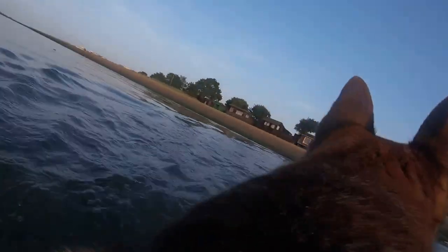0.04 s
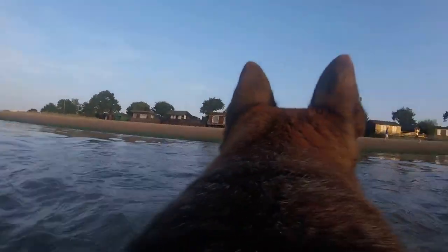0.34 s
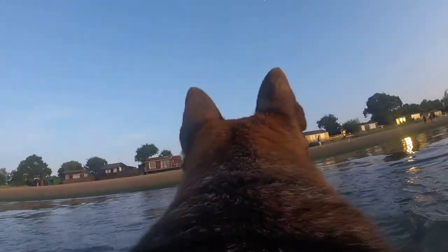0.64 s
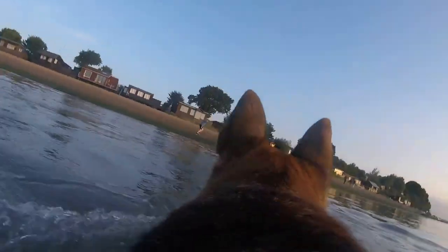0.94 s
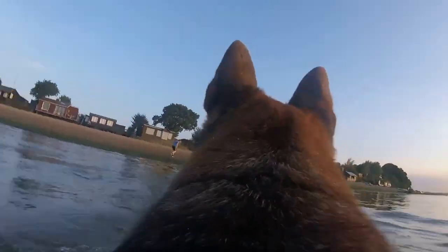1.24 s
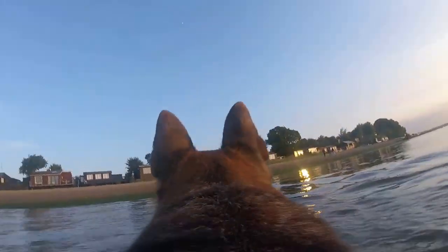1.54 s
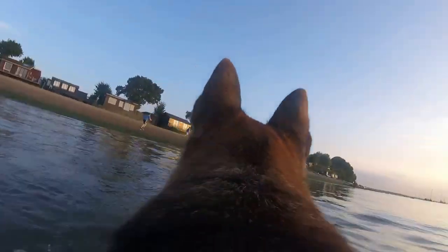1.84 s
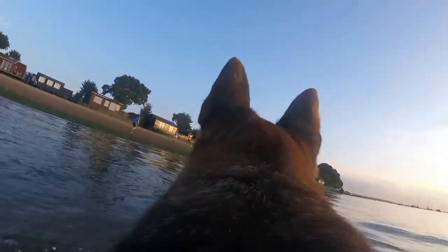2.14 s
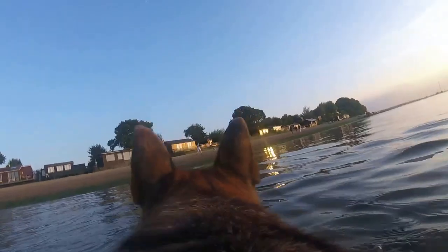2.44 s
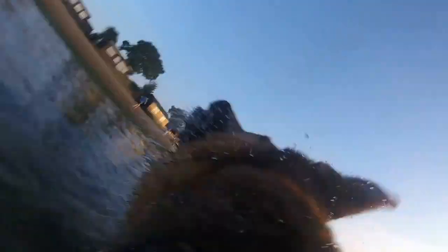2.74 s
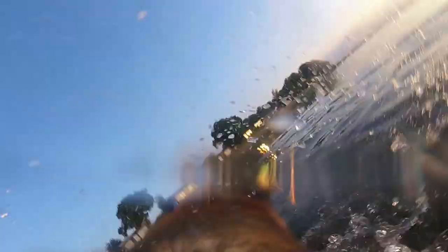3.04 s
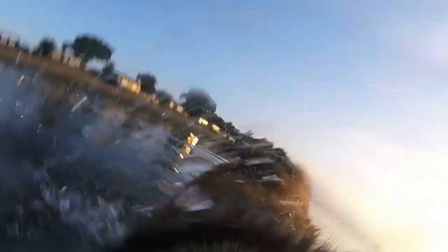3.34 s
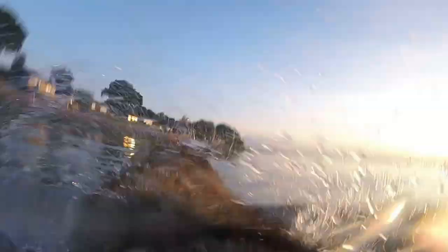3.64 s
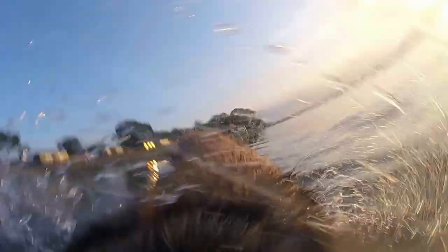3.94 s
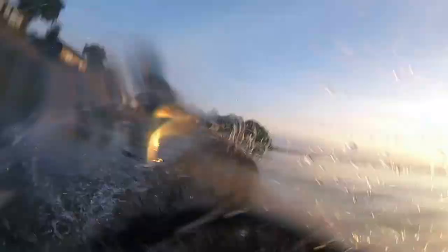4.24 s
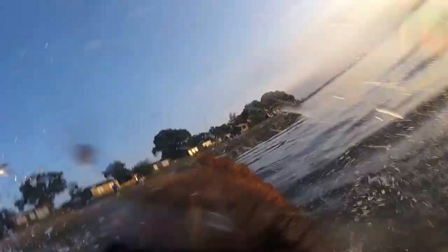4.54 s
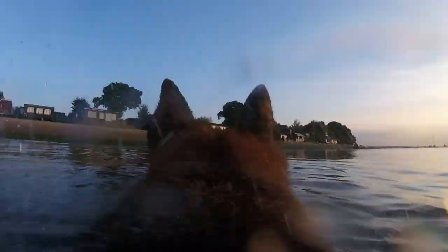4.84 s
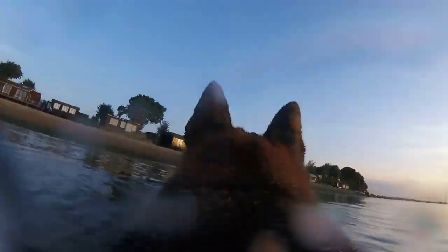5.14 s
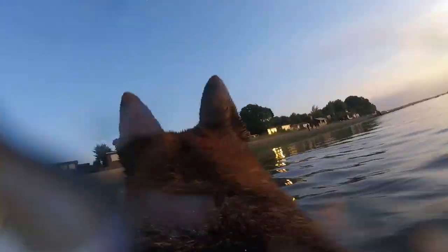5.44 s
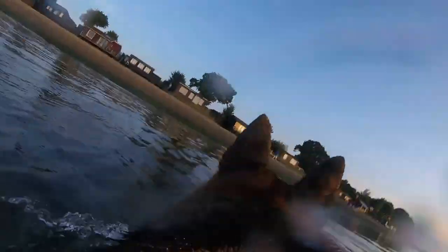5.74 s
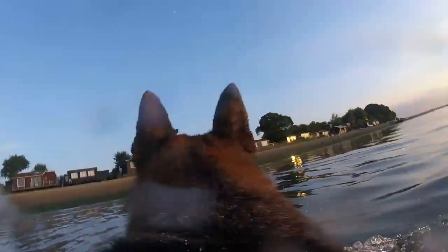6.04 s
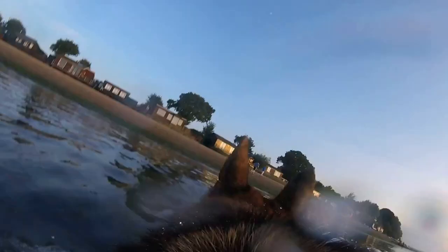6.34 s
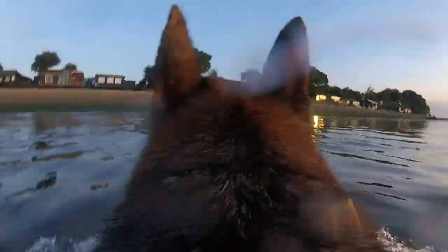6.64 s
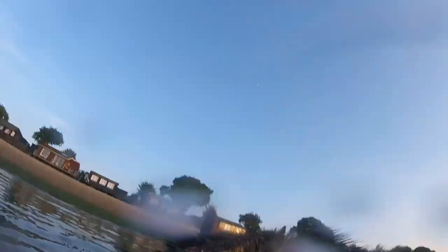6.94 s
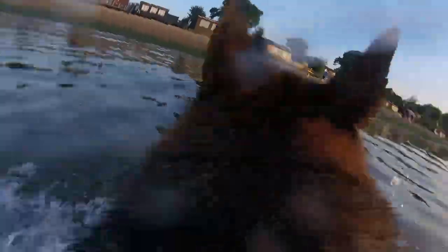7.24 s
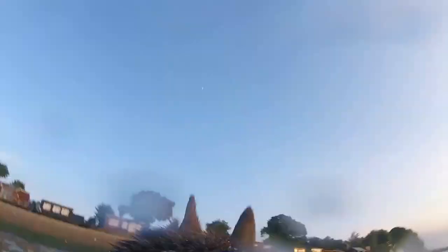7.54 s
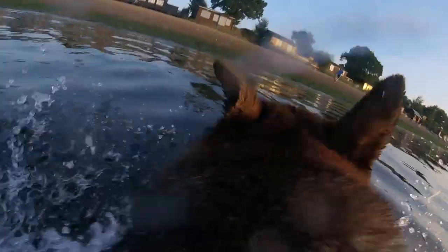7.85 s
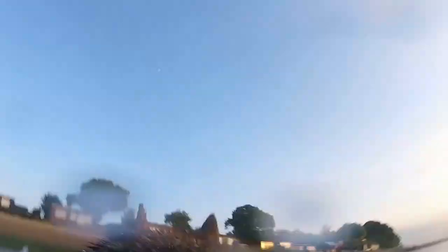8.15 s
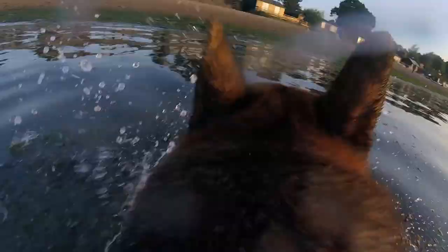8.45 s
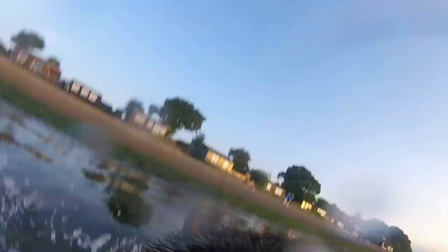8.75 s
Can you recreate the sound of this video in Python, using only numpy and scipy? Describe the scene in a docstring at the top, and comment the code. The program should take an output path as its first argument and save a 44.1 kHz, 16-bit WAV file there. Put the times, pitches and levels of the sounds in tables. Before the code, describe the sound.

A wading dog stirs lapping seawater, shakes its wet coat against the microphone, then bounds on with heavy splashes.

```python
"""Shallow sea, heard from a waterproof camera strapped to a wading dog's back.
Stirred water laps and gurgles as foam bursts, trapped air rings and drops tick. The dog shakes itself:
its wet coat flaps, and water slaps the hollow case and floods the microphone port. After a lull it
bounds on through heavy splashes, heard through a ringing film of water that rises in pitch as it drains.
Underneath, air rumbles on the swinging case."""
import sys
import numpy as np
from scipy import signal
from scipy.fft import rfft, irfft
from scipy.io import wavfile
from scipy.ndimage import uniform_filter1d

SR = 44100
rng = np.random.default_rng(int(sys.argv[2]) if len(sys.argv) > 2 else 0)


def master_out(mix):
    """Clip the mix to full scale and print it as 16-bit PCM to the path in sys.argv[1]."""
    frames = np.transpose(np.atleast_2d(mix))
    ceiling = np.clip(frames, -1, 1)
    pcm = np.round(ceiling * 32767).astype(np.int16)
    wavfile.write(sys.argv[1], SR, pcm)


N = 396900
TIME = np.arange(N) / SR

# how hard the dog stirs the sea, as the slosh's level between surges: t/s, level/dB
EFFORT = [(0, -47.5), (.2, -46), (.33, -50.5), (.5, -53.5), (.82, -51.5), (.88, -42), (1.13, -31.5),
          (1.25, -37), (1.29, -41), (2.25, -36.5), (2.5, -40), (2.8, -36.5), (3.1, -43.5), (3.75, -37.5),
          (4.1, -43.5), (4.47, -52), (4.56, -62), (5.0, -59), (5.15, -53.5), (5.62, -43), (5.8, -31),
          (6.4, -30), (7.5, -25), (7.75, -29), (8.15, -29), (8.32, -35), (8.5, -28.5), (8.75, -29),
          (9, -32.5)]
# airborne spray between the swings of the shake; late on it heaves with the bounds: t/s, level/dB
SPRAY_LEVEL = [(0, -47), (.35, -50.5), (.8, -49.5), (1.15, -39.5), (1.25, -43.5), (1.31, -47), (2.3, -42),
               (2.8, -44), (3.2, -46.5), (3.5, -43), (3.82, -36.5), (3.95, -50), (4.2, -44.5),
               (4.47, -46.5), (4.56, -57.5), (5.0, -59), (5.3, -52.5), (5.62, -47), (5.8, -41.5),
               (6.27, -34), (6.48, -40.5), (6.6, -36), (6.78, -34.5), (6.85, -28.5), (6.98, -35),
               (7.11, -40.5), (7.25, -30.5), (7.36, -28), (7.51, -32.5), (7.62, -32), (7.71, -36),
               (7.79, -32), (7.87, -26.5), (7.98, -27.5), (8.11, -34), (8.19, -30), (8.28, -40),
               (8.38, -30.5), (8.57, -28.5), (8.68, -33.5), (9, -32)]
# tone of the mid slosh, the bright spray and the deep churn: f/Hz, level/dB
SLOSH_EQ = [(150, -21), (270, -6), (350, -1), (550, 0.5), (850, -1), (1200, -2.5), (2000, -7), (2800, -13),
            (4000, -15.5), (8000, -46)]
SPRAY_EQ = [(500, -36), (1500, 1.5), (2600, 3), (4000, 0.5), (5500, 0.5), (9000, -0.5), (16000, -16)]
CHURN_EQ = [(40, -35), (90, -4), (190, -4), (290, -2), (450, -11), (900, -30), (3000, -60)]
def water():
    """Stirred sea: slosh and spray blend foam, bubbles and drops over a churn of big, damped bubbles."""
    hiss, ring, tick = texture()
    ticks = tick * patter(per_s=600, spread_db=5)
    slosh = hiss * foam(patchy_db=.5, flicker_db=.9)
    slosh += ring * swarm(310, 2808, per_s=750, cycles=6.84, spread_db=4, glide=.165)
    spray = hiss * foam(patchy_db=2.5, flicker_db=1.16)
    spray += ring * swarm(1482, 14160, per_s=1000, cycles=6.8, spread_db=7.5, glide=.066)
    churn = swarm(72.4, 704, per_s=420, cycles=1.34, spread_db=3, glide=.073, count=16)
    effort_db, easy_pace_db = curve(EFFORT, 1), -40
    churn_db = -57 + .47 * (effort_db - easy_pace_db)
    slosh_gain = layer_gain(effort_db, swing=(-44, 1.5, 7, 9), bound=(-33.5, .16, 3.2, .66))
    spray_gain = layer_gain(curve(SPRAY_LEVEL, 1), swing=(-54.5, 1.1, 1.5, 1.5))
    # the chest ploughs in after each landing
    churn_gain = layer_gain(churn_db, swing=(-34.5, 0, .045, .05), bound=(-28, .25, .43, .2))
    # flung drops land in clumps: the more patter, the more the level flutters
    clumps = amp(7 * tick ** 2 * wander(14))
    return clumps * (coloured(slosh + ticks, SLOSH_EQ) * slosh_gain
                     + coloured(spray + ticks, SPRAY_EQ) * spray_gain
                     + coloured(churn, CHURN_EQ) * churn_gain)


# the water's grain while drifting, wading, shaking, resting and bounding:
# start/s, then power weights of foam, bubbles, patter
GAITS = [(0, 0.68, 0.28, 0.098), (.95, 0.44, 0.47, 0.24), (2.85, 0.4, 0.067, 0.28), (4.6, 0.32, 0.27, 0.12),
         (5.6, 0.81, 0.072, 0.07)]
def texture(blend_s=.85):
    """The gains of foam, bubbles and patter; each gait crossfades into the next."""
    gaits = np.array(GAITS)
    current = np.searchsorted(gaits[:, 0], TIME, "right") - 1
    weights = uniform_filter1d(gaits[current, 1:].T, size=int(blend_s * SR), axis=1)
    return np.sqrt(weights / weights.sum(axis=0))


def foam(patchy_db, flicker_db):
    """Countless tiny bursts merge into a hiss that comes in patches and flickers."""
    _, t, spectrum = signal.stft(rng.standard_normal(N), SR, nperseg=256)
    patches = uniform_filter1d(rng.standard_normal(spectrum.shape), size=4, axis=0)
    patches = unit_rms(uniform_filter1d(patches, size=5, axis=1))
    flicker = unit_rms(uniform_filter1d(rng.standard_normal(len(t)), size=4))
    spectrum *= amp(patchy_db * patches + flicker_db * flicker)
    return unit_rms(signal.istft(spectrum, SR, nperseg=256)[1][:N])


def bubble(hz, decay, rise):
    """A trapped air pocket rings; its pitch glides by `rise` octaves/s as it nears the surface."""
    t = np.arange(int(5 * decay * SR) + 8) / SR
    turns = np.cumsum(hz * 2 ** np.minimum(rise * t, 2)) / SR
    envelope = (1 - np.exp(-2 * t * hz)) * np.exp(-t / decay) * (1 - (t / t[-1]) ** 2)
    return np.sin(2 * np.pi * turns) * envelope


def swarm(low_hz, high_hz, per_s, cycles, spread_db, glide, count=36):
    """Bubbles of `count` sizes ring at random moments, most faint and a few loud."""
    out = np.zeros(N)
    for hz in np.geomspace(low_hz, high_hz, count):
        ring, climb = rng.random(2)
        gap, size, sign = rng.random((2000, 3)).T
        births = np.cumsum(-np.log(1 - gap)) * count / per_s
        heights = amp(spread_db * np.minimum(-np.log(1 - size), 3.5)) * np.sign(sign - .5)
        heights = heights[births < N / SR]
        decay = cycles * (.5 + ring) / hz
        ping = bubble(hz, decay, glide * climb / decay)
        ping *= np.sqrt(hz / np.sum(ping ** 2) / np.sum(heights ** 2))  # equal power per Hz
        for s, height in zip(births, heights):
            add(out, s, height * ping)
    return unit_rms(out)


def patter(per_s, spread_db):
    """Drops strike as bare ticks, most faint and a few loud."""
    chance, size, sign = rng.random((3, N))
    heights = amp(spread_db * np.minimum(-np.log(1 - size), 4)) * np.sign(sign - .5)
    return unit_rms((chance < per_s / SR) * heights)


# accent of each swing of the shake: level/dB
SWING_DB = [2.5, 0, 1.5, 6, 9.5, -19, 1.5, 2]
# the dog's landings as it bounds through the shallows: t/s, accent/dB
BOUNDS = [(6.27, -13), (6.82, -1.5), (7.38, 0.5), (7.94, 0), (8.5, 0), (9.02, -8)]
def layer_gain(steady_db, swing, bound=None, first_s=2.89, period_s=.211, end_s=4.495, stop_s=.012):
    """A steady level plus a surge per swing and bound, each as (level/dB, lag/s, attack/s, release/s)."""
    swings = [(first_s + k * period_s, db) for k, db in enumerate(SWING_DB)]
    gate = np.clip((end_s - TIME) / stop_s + 1, 0, 1)  # the shake stops dead
    bounding = surges(BOUNDS, *bound) if bound else 0
    return np.sqrt(amp(steady_db) ** 2 + gate * surges(swings, *swing) + bounding)


def surges(moves, db, lag, attack, release):
    """The power of a layer that swells and ebbs with every movement."""
    power, t = np.zeros(N), np.arange(-SR // 4, SR // 2) / SR
    shape = np.exp(-(t / np.where(t < 0, attack, release)) ** 2)
    for s, accent_db in moves:
        add(power, s + lag + t[0], (amp(db + accent_db) * shape) ** 2)
    return power


# sheets of water thrown by coat or legs: t/s, splash/dB, gulp/dB, gulp f/Hz, attack/s
SPLASHES = [(1.112, -33, -26, 800, 0.0113), (1.157, -24, -22, 750, 0.0033), (1.750, -28, -32.5, 500, 0.01),
            (2.748, -23.5, -21, 227, 0.0059), (2.782, -27, -16, 181, .009),
            (3.000, -25.5, -21.5, 269, 0.012), (3.228, -55, -26, 230, .014), (3.29, -36, -26, 330, .014),
            (3.405, -34.5, -25, 320, 0.0174), (3.516, -37, -18.5, 343, .012),
            (3.63, -30, -24.5, 394, 0.0148), (3.715, -32, -20, 446, .014), (3.832, -26, -18, 350, 0.0072),
            (3.875, -32.5, -23, 299, 0.0078), (5.777, -30.5, -26.5, 255, 0.0127),
            (6.192, -23.5, -27, 157, 0.00697), (6.285, -27.5, -40, 400, 0.017),
            (6.495, -19, -33, 500, 0.0027), (6.555, -31, -24.5, 328, 0.0168),
            (6.605, -30, -24.5, 172, 0.015), (6.69, -24.5, -25.5, 425, .014), (6.78, -36, -31, 170, 0.0095),
            (6.97, -23.5, -24, 403, 0.012), (7.092, -43.5, -28, 240, 0.0103),
            (7.19, -23.5, -27, 168, 0.0108), (7.29, -36, -30, 161, .012), (7.333, -20.5, -16, 445, 0.014),
            (7.454, -28, -19.5, 173, 0.0131), (7.495, -21.5, -22, 300, 0.012),
            (7.575, -21.5, -16, 221, 0.0111), (7.615, -23, -17, 201, 0.012), (7.714, -35, -29, 500, 0.016),
            (7.852, -12.5, -14, 443, 0.0079), (7.993, -19, -31, 403, 0.018), (8.085, -39, -25, 478, .028),
            (8.115, -25, -16.5, 203, 0.0099), (8.180, -19.5, -16.5, 610, 0.0021),
            (8.215, -28.5, -21, 258, 0.012), (8.455, -16, -21.5, 490, 0.0096),
            (8.583, -13, -19, 304, 0.0053), (8.653, -47, -11, 186, 0.0074), (8.71, -36, -25.5, 329, 0.026),
            (8.795, -29.5, -17, 238, 0.0116), (8.972, -19.5, -16, 263, 0.015)]
def splashes(spray_db=-8, noise_trim_db=-3, cycles=.91, clump_db=3, clump_hz=350):
    """A sheet of water bursts in clumps on landing, and the air it traps gulps."""
    out, t = np.zeros(N), np.arange(SR // 5) / SR
    for s, db, gulp_db, hz, attack in SPLASHES:
        slosh, spray, air = rng.standard_normal((3, len(t)))
        clumps = unit_rms(amp(clump_db * wander(clump_hz, len(t))))
        burst = (coloured(slosh, SLOSH_EQ) + amp(spray_db) * coloured(spray, SPRAY_EQ)) * clumps
        pockets = coloured(air, [(hz / 4, -25), (hz * .55, 0), (hz * 1.15, 0), (hz * 3, -25),
                                 (hz * 9, -70)])
        swell = amp(noise_trim_db) * (t / attack * np.exp(1 - t / attack)) ** 2
        add(out, s, swell * (amp(db) * burst + amp(gulp_db) * pockets))
        add(out, s + attack / 2, amp(gulp_db) * bubble(hz, cycles / hz, 0))  # the largest pocket
    return out


# hollow ring of the case: f/Hz, level/dB, decay/s
CASE_MODES = [(800, -6.5, 0.0021), (1930, -1, 0.00063), (2720, -11.5, 0.00178)]
# hard hits of water and harness on the case:
# t/s, crack/dB, cutoff/Hz, snap/dB, ring/dB, thud/dB, thud f/Hz, thud decay/cycles, fizz/dB
SLAPS = [(2.926, -3, 4130, -38, -5.5, -3, 336, 0.64, -53), (2.929, -5, 2470, -44, -8, -3.5, 210, 1.66, -48),
         (3.0874, -2, 8100, -24, -31, -13, 90, 0.64, -52), (3.946, -6, 4200, -42, -9, 5, 342, 0.65, -27),
         (3.9671, -9, 3020, -42, -8, -6, 534, 0.65, -38), (4.019, -17, 2940, -51, -12, 0, 350, 0.65, -29),
         (4.3695, -2.5, 3670, -36, -13.5, -3, 112, 0.66, -51),
         (4.5554, -2.5, 2566, -25, -12, -3, 157, 0.36, -77),
         (4.595, -32, 6950, -48, -41, -34.5, 150, 0.58, -72.5),
         (4.692, -32, 2500, -60, -50, -22, 132, .55, -69),
         (4.939, -34, 1200, -64, -46, -28, 250, 0.47, -72)]
def slaps(crack_s=.0019, rattle_db=-12, fizz_hz=2400, fall_s=.02, fizz_width_hz=480, fizz_s=.018):
    """A blow cracks on the case, its walls knock and thud, and water runs off in a falling fizz."""
    out, t = np.zeros(N), np.arange(SR // 12) / SR
    knock = sum(amp(db) * np.sin(2 * np.pi * hz * t) * np.exp(-t / decay) for hz, db, decay in CASE_MODES)
    falling_hz = fizz_hz * (1 + .25 * np.exp(-t / fall_s))
    sweep = np.cos(2 * np.pi * np.cumsum(falling_hz) / SR)
    for s, db, top_hz, snap_db, ring_db, thud_db, thud_hz, thud_cycles, fizz_db in SLAPS:
        grit, runoff = rng.standard_normal((2, len(t)))
        pulse = lowpass((1 - t * top_hz / 2) * np.exp(-t * top_hz / 2), top_hz, order=4)
        rattle = lowpass(grit * np.exp(-t / crack_s), top_hz, order=6) * np.sqrt(SR / 2 / top_hz)
        crack = pulse / pulse.max() + amp(rattle_db) * rattle
        snap = grit * np.exp(-2 * t / crack_s)
        fizz = unit_rms(lowpass(runoff, fizz_width_hz, order=4) * sweep) * np.exp(-t / fizz_s)
        add(out, s, amp(db) * crack + amp(snap_db) * snap + amp(fizz_db) * fizz)
        add(out, s, amp(ring_db) * lowpass(knock, top_hz, order=4))
        add(out, s + 1 / top_hz, amp(thud_db) * bubble(thud_hz, thud_cycles / thud_hz, 0))
    return out


# coat flaps during the shake: t/s, thump/dB, thump f/Hz, relative smack/dB
FLAPS = [(2.850, -3.5, 69.3, -17), (3.024, -6, 260, -24), (3.102, -6, 190, -42.5), (3.143, -7, 188, -30),
         (3.186, -12, 189, -37), (3.275, -19, 250, -31), (3.290, -8, 162, -22), (3.306, -5, 150, -28),
         (3.339, -2.5, 183, -22), (3.357, -10, 80, -33), (3.465, -4.5, 200, -27), (3.511, -11, 250, -27),
         (3.536, -11.5, 330, -25.5), (3.579, -9, 200, -29), (3.637, -5, 173, -24), (3.675, -8, 204, -24.5),
         (3.706, -5, 160, -20), (3.722, -9, 330, -31.5), (3.741, -1.5, 129, -24), (3.786, -17, 169, -20.5),
         (3.836, -5, 158, -17.5), (3.872, -5.5, 200, -22), (4.129, -6.5, 167, -39), (4.169, -4.5, 123, -26),
         (4.326, -11, 231, -31), (4.354, -9.5, 197, -30), (4.485, -12, 95, -26.5)]
# tone of wet fur smacking: f/Hz, level/dB
SMACK_EQ = [(120, 7), (350, 3), (800, -2.5), (1300, -11), (3000, -19), (6000, -26), (10000, -40)]
def coat(thump_cycles=.7, attack_s=.00052, decay_s=.00352):
    """Folds of wet coat flap against the harness: each a dull thump with a short wet smack."""
    out, t = np.zeros(N), np.arange(SR // 20) / SR
    envelope = (1 - np.exp(-t / attack_s)) * np.exp(-t / decay_s)
    for s, thump_db, hz, smack_db in FLAPS:
        smack = coloured(rng.standard_normal(len(t)), SMACK_EQ) * envelope
        add(out, s, amp(thump_db) * bubble(hz, thump_cycles / hz, 0))
        add(out, s, 2 * amp(smack_db) * smack)
    return out


# close, single bubbles: t/s, level/dB, starting f/Hz, decay/s, glide/(octaves/s)
PLOPS = [(.090, -29.5, 463, 0.0348, 13.5), (.088, -29.5, 1149, 0.011, 35), (.178, -30, 1170, 0.0078, 1),
         (.177, -21.5, 1844, 0.0015, 10), (.209, -23, 2100, 0.0033, 6), (.228, -32, 808, 0.026, 21.5),
         (.254, -31.5, 556, 0.0078, -9), (.362, -30.5, 1284, 0.01, 11), (.518, -35.5, 1080, .012, 9),
         (.616, -28, 1068, 0.0107, -6.5), (.70, -39.5, 880, 0.018, -0.5), (.829, -31.5, 522, 0.016, 11),
         (.92, -34.5, 407, 0.0166, 5), (1.005, -27.5, 527, 0.028, 5), (1.122, -25, 346, 0.024, 9),
         (1.160, -28, 444, 0.023, -9.5), (1.222, -35.5, 306, 0.043, 2), (1.564, -19.5, 1657, 0.00305, 2),
         (1.612, -29, 574.5, 0.024, 9), (1.680, -28.5, 341, 0.0132, -3), (1.382, -29, 1590, 0.0044, 23),
         (1.547, -26, 1870, 0.0027, 10), (1.785, -26, 395, 0.0108, 0), (1.883, -30, 1630, 0.0036, 10),
         (1.925, -23, 696, 0.0077, -8), (1.979, -32, 994, 0.0074, 13.5), (2.04, -29, 1310, 0.0055, 12),
         (2.005, -27.5, 580, 0.0075, -7.5), (2.098, -17, 1010, 0.004, -2.5), (2.135, -22.5, 1056, .012, 20),
         (2.210, -24.5, 852, 0.023, 13.5), (2.299, -17, 700, .0075, -2), (2.312, -22, 440, 0.0068, -7),
         (2.334, -15.5, 1371, 0.0031, 13), (2.506, -21, 535, 0.017, 3.5), (2.670, -21, 1540, 0.0051, 8),
         (2.752, -24, 624, 0.025, 3.5), (5.064, -36.5, 1223, 0.0082, 5), (5.110, -32.5, 407, 0.025, 16),
         (5.255, -33, 1044, 0.0049, -8), (5.401, -28, 407, 0.0094, -9), (5.545, -37, 479, 0.0346, 13),
         (5.695, -31, 455, .018, 19), (6.497, -13, 1073, 0.0038, 2.5), (6.560, -14, 267, 0.012, 5),
         (7.625, -15.5, 261.4, 0.027, 4), (8.243, -17, 322.5, 0.0255, 5), (8.422, -14.5, 290, 0.019, 10)]
def plops(wobble=.28, wobble_hz=110, gurgle_db=-14, gurgle_s=.041, gurgle_cycles=4, count=7):
    """Large bubbles beside the dog's chest wobble as they rise, in a gurgle of smaller ones."""
    out = np.zeros(N)
    for s, db, hz, decay, rise in PLOPS:
        add(out, s, amp(db) * bubble(hz, decay, rise))
        for when, pitch, size, glide in rng.random((count, 4)):
            small_hz = hz * 2 ** (-.13 + 1.446 * pitch)
            small = 2 * size * bubble(small_hz, gurgle_cycles / small_hz, glide * abs(rise))
            add(out, s + gurgle_s * (when - .25), amp(db + gurgle_db) * small)
    return out * (1 + wobble * wander(wobble_hz))


# drops landing close by: t/s, level/dB, f/Hz
DROPS = [(.161, -30.5, 6450), (.47, -33.5, 6500), (.677, -29, 7400), (0.689, -27, 3400),
         (.690, -26.5, 6500), (.728, -28, 6000), (.752, -43.5, 4600), (0.868, -24.5, 2270),
         (0.999, -24.5, 6250), (1.066, -24, 3140), (1.088, -19.5, 4100), (1.158, -16.5, 3320),
         (1.17, -16.5, 5960), (1.208, -38, 3600), (1.245, -26, 2860), (1.256, -30, 5200),
         (1.752, -15.5, 2546), (1.853, -28, 2290), (1.902, -15.5, 4440), (1.923, -13, 6400),
         (2.179, -24, 2750), (2.242, -24.5, 6500), (2.298, -16.5, 3380), (2.348, -22, 2550),
         (2.385, -17.5, 3900), (2.495, -24, 5600), (2.641, -19, 3600), (2.66, -19, 2060), (4.2, -24, 4540),
         (4.42, -21, 6300), (5.116, -36, 4280), (5.537, -21.5, 4570), (5.55, -23, 4720)]
def drops(tick_s=.00154, tick_db=-5, ring_db=-4, cycles=4.72):
    """Each drop ticks on the surface and leaves a tiny ringing bubble."""
    out, t = np.zeros(N), np.arange(SR // 40) / SR
    for s, db, hz in DROPS:
        tick_eq = [(hz / 5, -16), (hz * .73, 0), (hz * 1.2, 0), (hz * 4, -22)]
        tick = coloured(rng.standard_normal(len(t)), tick_eq) * np.exp(-t / tick_s)
        add(out, s, amp(db + tick_db) * tick)
        add(out, s, amp(db + ring_db) * bubble(hz, cycles / hz, rise=8))
    return out


def gulps():
    """Large bubbles gulp in the hole that each bound leaves."""
    bubbles = swarm(271, 860, per_s=150, cycles=3.9, spread_db=2.2, glide=.11, count=14)
    return bubbles * np.sqrt(surges(BOUNDS, db=-32, lag=0, attack=.14, release=.03))


# bed of air rumble between jolts: t/s, level/dB
DRAUGHT = [(0, -44), (1.0, -42.5), (2.7, -39), (3.0, -26.5), (3.7, -29), (4.1, -30.5), (4.5, -33.5),
           (4.65, -45.5), (5.1, -55), (5.6, -47.5), (6.6, -40), (7.4, -34), (8.3, -35), (9, -25.5)]
# the case lurches with a step: t/s, level/dB
LURCHES = [(.26, -34.5), (.42, -39), (1.6, -36.5), (1.87, -38), (2.45, -34), (2.87, -17), (4.57, -32.5),
           (5.8, -35), (5.98, -36), (6.19, -35), (6.49, -39), (6.9, -31), (7.12, -24), (7.45, -25),
           (7.73, -26), (8.5, -28)]
# tone of the rumble: f/Hz, level/dB
RUMBLE_EQ = [(5, -9.5), (18, -2.5), (35, 2), (60, -1), (95, -6.5), (150, -14), (400, -29), (1500, -85)]
def buffet():
    """Air rumbles on the case as it swings and lurches with the dog."""
    sway_power = layer_gain(curve(DRAUGHT, 1), swing=(-33.5, 0, .04, .05)) ** 2
    lurch_power = surges(LURCHES, db=0, lag=.00091, attack=.025, release=.035)
    return coloured(rng.standard_normal(N), RUMBLE_EQ) * np.sqrt(sway_power + lurch_power)


def amp(db):
    """Decibels to gain."""
    return 10 ** (np.asarray(db) / 20)


def unit_rms(x):
    """Scales to rms 1."""
    return x / np.sqrt(np.mean(x ** 2) + 1e-20)


def curve(rows, column, t=TIME):
    """One column of a table, joined by straight lines in time."""
    rows = np.asarray(rows)
    return np.interp(t, rows[:, 0], rows[:, column])


def eq_gain(eq, hz):
    """An EQ curve's gain at the frequencies hz."""
    f, db = np.transpose(eq)
    return amp(np.interp(np.log(hz + 1), np.log(f + 1), db))


def equalised(x, eq):
    """Filters a sound through an EQ curve."""
    return irfft(rfft(x) * eq_gain(eq, np.fft.rfftfreq(len(x), 1 / SR)), len(x))


def coloured(x, eq):
    """Equalises a sound and sets it to rms 1."""
    return unit_rms(equalised(x, eq))


def lowpass(x, hz, order=2):
    """Causal low-pass."""
    return signal.sosfilt(signal.butter(order, min(hz, .45 * SR), fs=SR, output="sos"), x)


def wander(hz, length=N):
    """Random modulation below hz, at rms 1."""
    return unit_rms(lowpass(rng.standard_normal(length), hz))


def add(mix, s, sound):
    """Mixes a sound in at time s."""
    part = mix[max(round(s * SR), 0):][:len(sound)]
    part += sound[:len(part)]


# slugs of water over the port: start/s, end/s, cutoff/Hz, gain/dB, treble leak/dB, fade/s
SLUGS = [(3.955, 4.085, 3700, 0, -8, .04), (4.503, 4.575, 2500, -10, -6, .008)]
def scene():
    """The bed of sea and rumble, muffled while a slug covers the port, with the close hits on top."""
    bed = water() + gulps() + buffet()
    for start, end, top_hz, db, leak_db, fade_s in SLUGS:
        cover = uniform_filter1d(1. * ((TIME > start) & (TIME < end)), size=int(fade_s * SR))
        muffle = [(top_hz, 0), (top_hz * 1.2, leak_db), (top_hz * 2, leak_db), (top_hz * 3, 3 * leak_db)]
        bed = (1 - cover) * bed + cover * amp(db) * equalised(bed, muffle)
    return (bed + plops() + drops() + splashes() + coat() + slaps())[None]


# tone of the microphone port when clear, flooded and under a film of water: f/Hz, gain/dB
CLEAR_EQ = [(5000, -1), (6400, -2), (7000, -2), (7500, -6.5), (8000, -8), (9000, -11.5), (10000, -15.5),
            (13000, -14.5), (14200, -51)]
FLOODED_EQ = [(4000, 1), (5500, 6.5), (6000, -3.5), (6600, 1), (7600, -2), (9200, -2), (9600, -14),
              (10000, -38), (14000, -22)]
FILM_EQ = [(1400, 0.5), (2200, 1.5), (2760, 3), (3100, -5.5), (4000, -5), (5000, -1.5), (6000, -4),
           (6700, 5.5), (7600, 6), (8400, -12.5), (8900, -76.5), (10100, -22.5), (11100, -16), (12700, -42)]
# water on the port: t/s, flooded share, film share, film pitch ratio (rises as the film thins)
PORT_WETNESS = [(3.15, 0, 0, .92), (3.3, 1, 0, .92), (5.52, 1, 0, .92), (5.66, 0, 1, .92),
                (6.8, 0, 1, .965), (9, 0, 1, 1.01)]
def record(dry, cavity_hz=6501, width_hz=215, cavity_db=8.2, top_hz=14400):
    """The port colours the sound by how wet it is; the hardest blows clip; the top end is cut."""
    hz, t, spectrum = signal.stft(dry[0], SR, nperseg=512, noverlap=384)
    hz = hz[:, None]
    flooded, film, tuning = (curve(PORT_WETNESS, column, t) for column in (1, 2, 3))
    port = (np.maximum(1 - flooded - film, 0) * eq_gain(CLEAR_EQ, hz)
            + flooded * eq_gain(FLOODED_EQ, hz)
            + film * eq_gain(FILM_EQ, hz / tuning))
    cavity = 1 + (amp(cavity_db) - 1) / (1 + 2j * (hz - cavity_hz) / width_hz)  # air behind the port rings
    heard = signal.istft(spectrum * port * cavity, SR, nperseg=512, noverlap=384)[1][:N]
    return signal.oaconvolve(np.clip(heard, -1, 1), signal.firwin(255, top_hz, fs=SR), "same")[None]


dry = scene()
out = record(dry)
master_out(out)
```